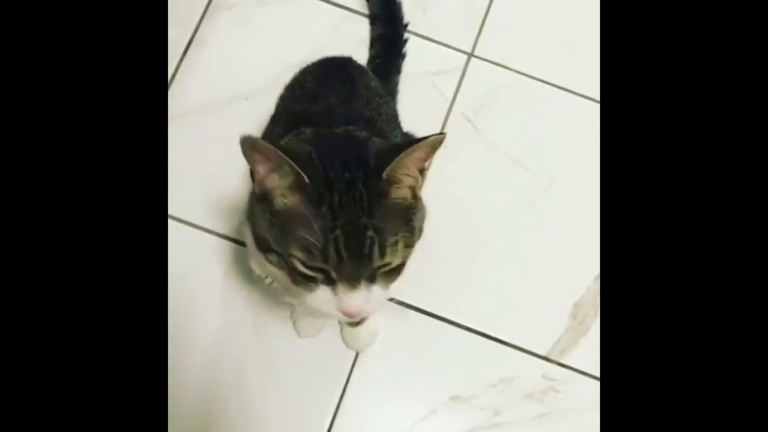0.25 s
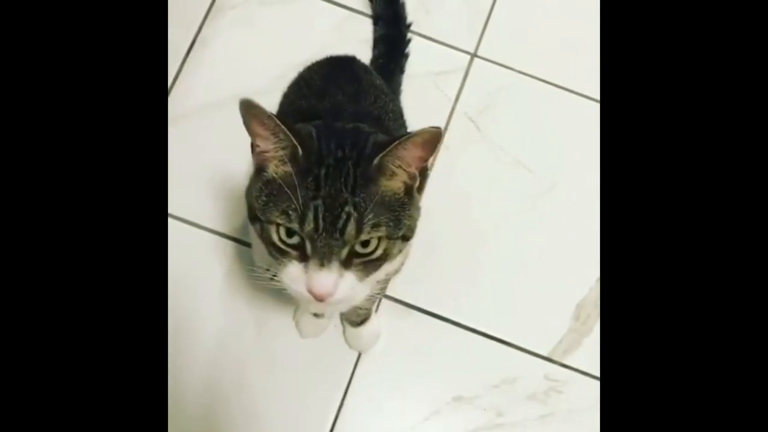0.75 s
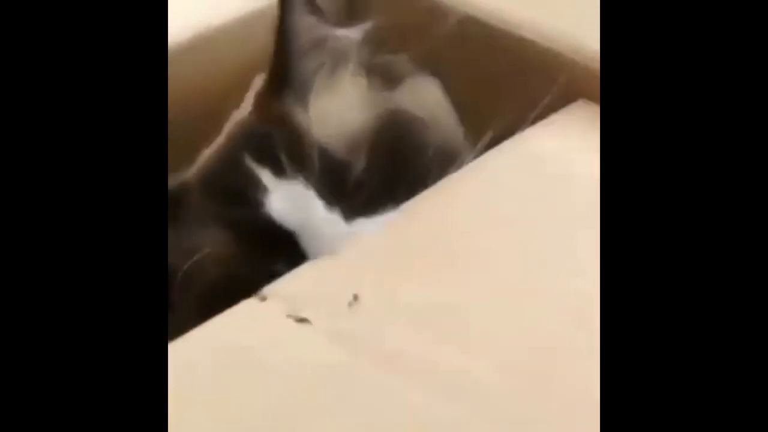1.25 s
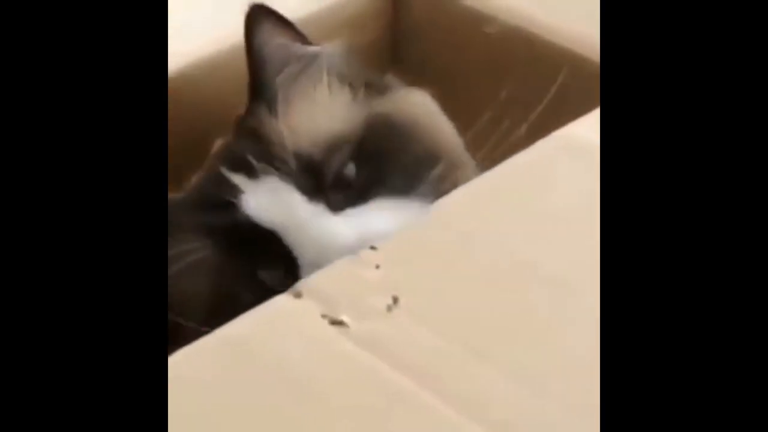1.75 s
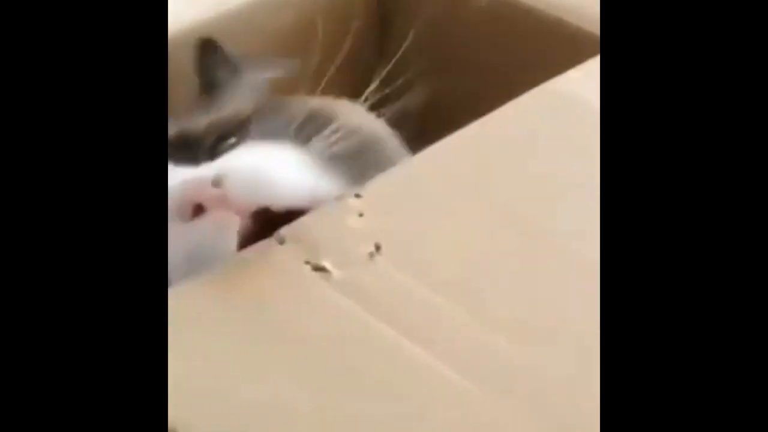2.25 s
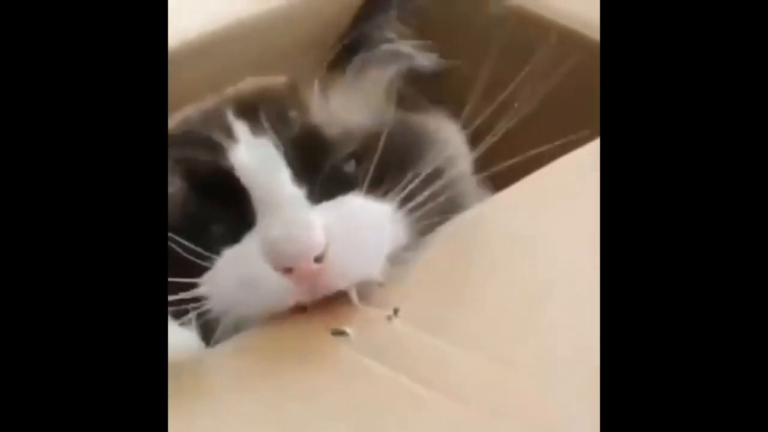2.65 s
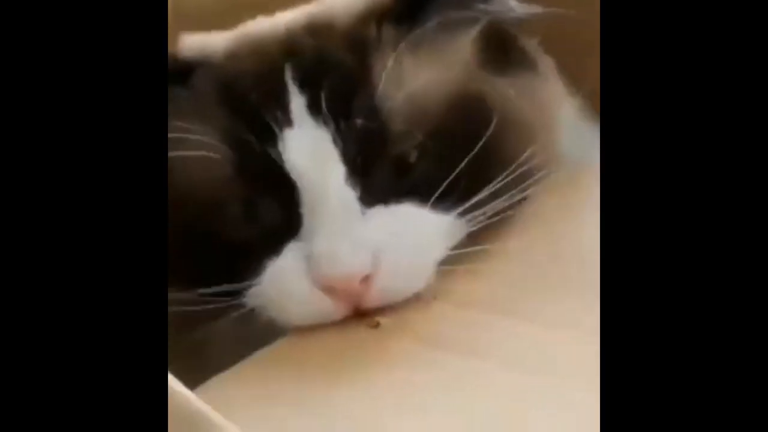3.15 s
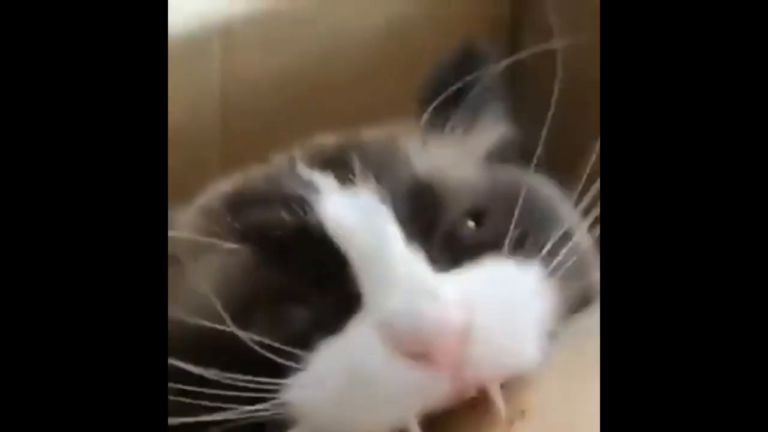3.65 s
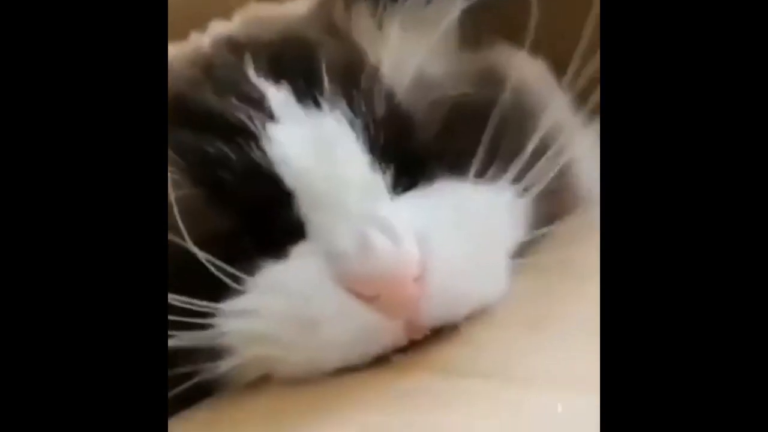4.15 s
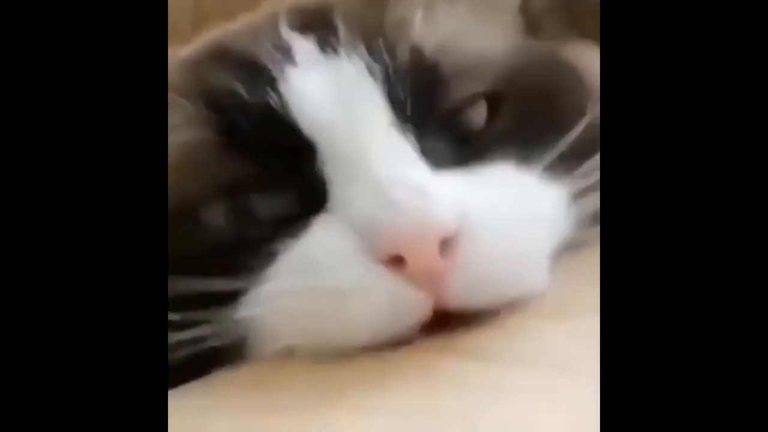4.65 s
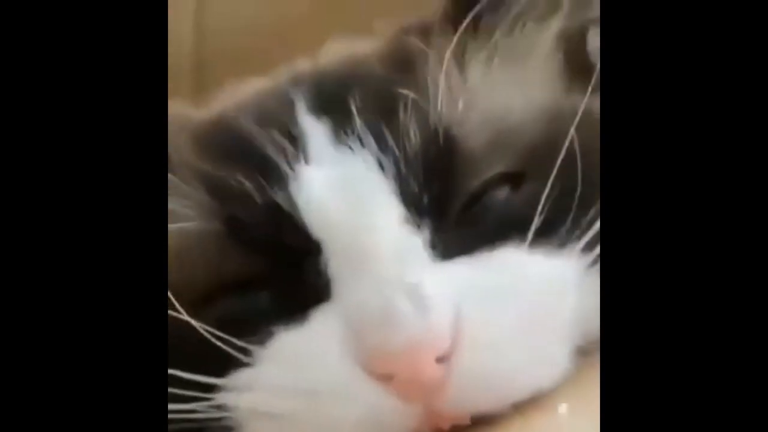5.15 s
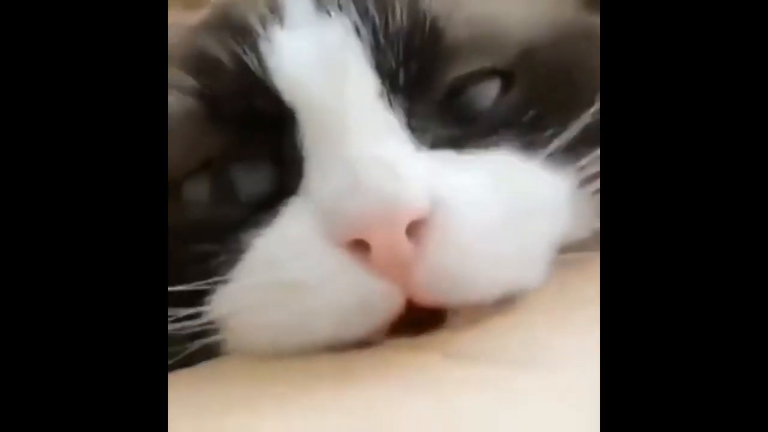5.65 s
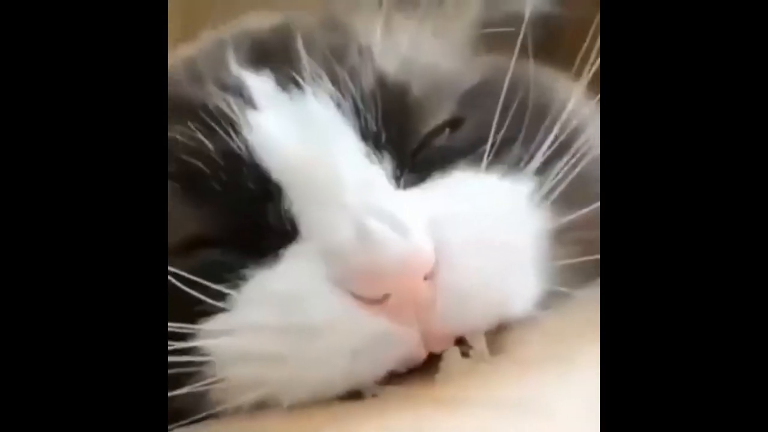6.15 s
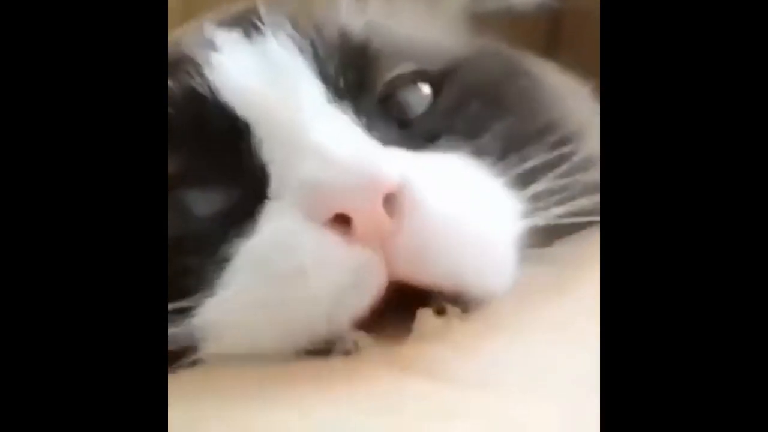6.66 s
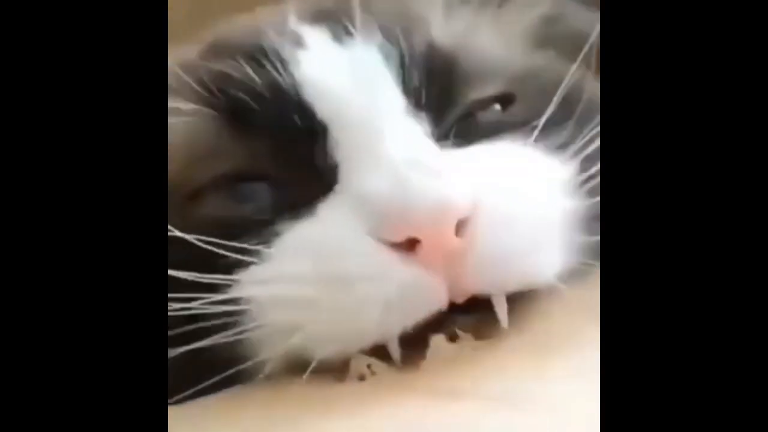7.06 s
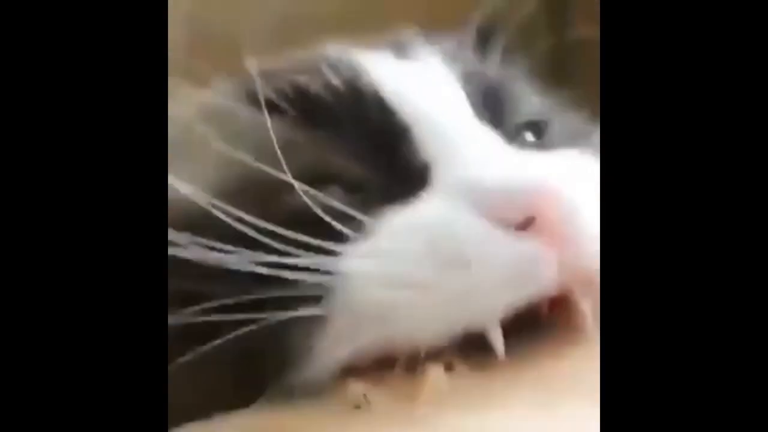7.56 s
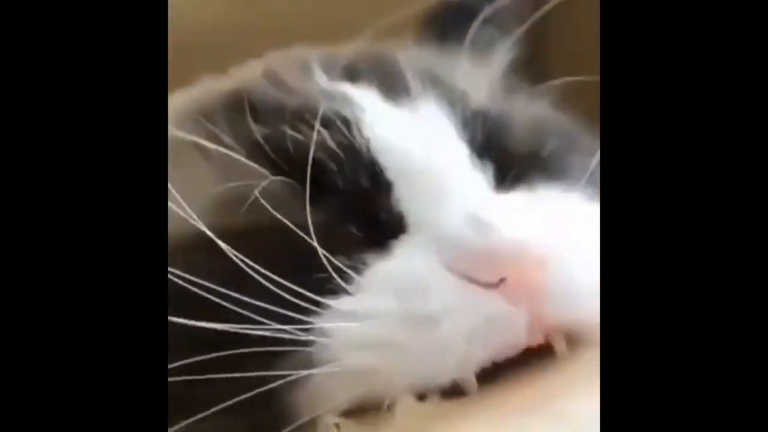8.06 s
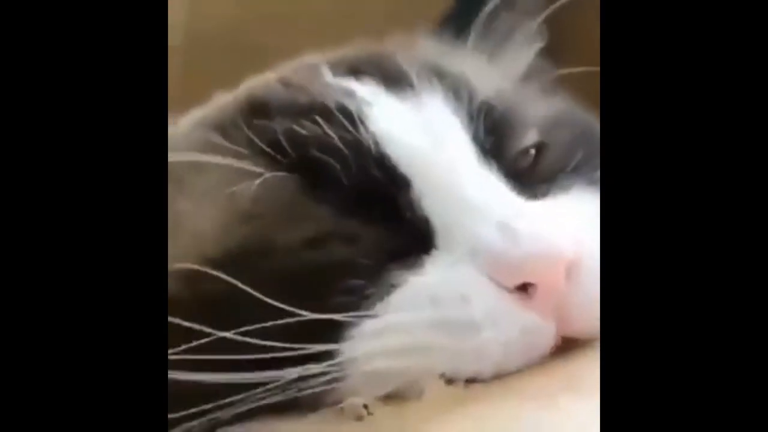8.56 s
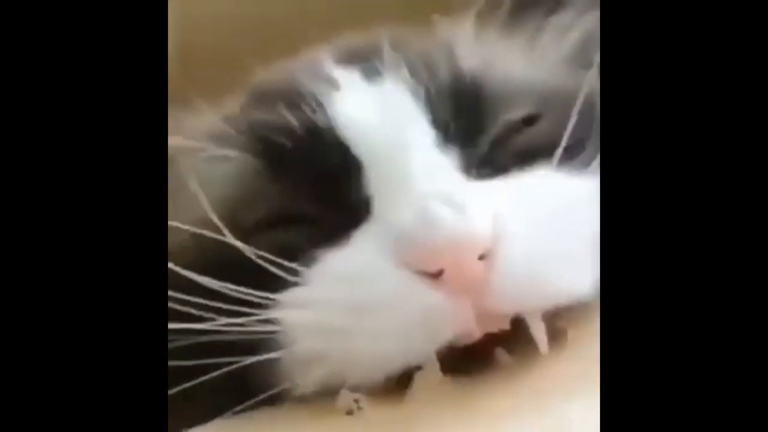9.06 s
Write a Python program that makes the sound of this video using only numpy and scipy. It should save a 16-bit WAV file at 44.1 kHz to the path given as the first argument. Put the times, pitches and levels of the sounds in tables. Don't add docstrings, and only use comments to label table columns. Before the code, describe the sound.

Very close, uneven cardboard chewing: papery rips, sharp fibre snaps, short creaks and boxy tooth knocks, following a near-silent opening and a short gap.

```python
import sys
import numpy as np
from scipy import signal
from scipy.fft import rfft, irfft, next_fast_len
from scipy.io import wavfile
from scipy.ndimage import uniform_filter1d

SR = 44100
rng = np.random.default_rng(int(sys.argv[2]) if len(sys.argv) > 2 else 0)


def gain_from_db(level_db):
    decades = np.asarray(level_db, float) / 20
    return 10 ** decades


def waveform_to_disk(signal):
    frames = np.transpose(np.atleast_2d(signal))
    scaled = np.clip(frames, -1, 1) * 32767
    samples = np.round(scaled).astype(np.int16)
    wavfile.write(sys.argv[1], SR, samples)


N = 411012

SILENCE = 1.009, 1.398
# frequency in Hz, level in dB.
TILED_ROOM = [(15, -56), (25, -19), (103, -5), (145, -15), (247, -14), (506, -24.5), (1320, -29.5),
              (4870, -42), (13400, -44), (14500, -47)]
# frequency in Hz, level in dB.
BOX_ROOM = [(15, -41), (25, -1), (222, -1.5), (275, -2.5), (735, 0.5), (1680, -5.5), (2020, -6),
            (12000, -20), (13400, -29), (14500, -42)]
# frequency in Hz, level in dB.
PAPER_COLOUR = [(1180, -7), (2000, -0.5), (2190, -13), (2810, -2), (6170, -1.5), (7720, -1.5), (9420, -3),
                (12900, -1.5), (14000, -8), (14500, -17)]
# pitch in Hz, width in Hz, level in dB.
BOX_MODES = [(206, 230, -4.5), (348.3, 18.7, 6.5), (436, 64, 2.5), (682, 320, -2.5)]
# pitch in Hz, width in Hz, level in dB.
FLAP_MODES = [(840, 680, -6.5), (1221, 370, 2.5), (1504, 190, -4), (2236, 316, -4.5), (2655, 120, -10)]
# centre in seconds, crackle in dB, spread in ms,
# flap rasp in dB above the crackle.
FLUTE_SNAPS = [(1.4183, -44, .35, -5), (1.7346, -37, 1.1, 3), (2.5374, -42, 0.76, 7),
               (2.879, -23, 1.4, -12), (3.9425, -17, 0.94, -17), (3.9909, -24, 0.76, -13),
               (4.0149, -21, 0.53, -27), (4.2893, -19.5, 1.4, -11), (4.4224, -20.5, 1.1, -29),
               (4.9333, -35, 1.1, -10), (5.5344, -32, 1.1, -10), (5.5574, -23, 0.51, -14),
               (6.3186, -25, 1.6, -0.5), (6.5947, -23, 0.88, -5), (7.7763, -26, 0.25, -12),
               (8.0198, -22.5, 0.43, -10), (8.0258, -26, 0.43, -11), (8.1104, -23.5, 0.84, -22),
               (8.1218, -32, 0.84, -20), (8.1285, -27, .9, -11), (8.1443, -25.5, .7, -10),
               (8.1904, -31, 0.74, -8), (8.2039, -34, .9, -20), (8.2363, -27.5, 1.1, -20),
               (8.2657, -23, .53, -14), (8.2787, -20.5, 1.45, -10.5), (8.35, -24, 2.7, -10),
               (8.7936, -37.5, 0.82, 15.5), (8.8125, -28.5, 2, 5), (8.8279, -28, 0.57, 2.5)]
LINER_SNAPS = [(3.064, -25.5, 0.52, -12), (3.073, -23, 0.45, -13), (3.09, -24, 0.45, -18),
               (3.9686, -37, 0.42, -14), (4.0892, -25.5, 0.98, -10), (4.2179, -17.5, 1.07, -24),
               (4.2648, -26.5, 0.63, -29), (4.3727, -25.5, 0.76, -25), (4.9233, -28, 1.6, -19),
               (5.4351, -34.5, 1.6, -17), (5.5963, -18.5, 0.97, -6), (6.0398, -33, 0.76, -25),
               (6.0627, -36, 1.4, -15), (6.4309, -36, 0.63, -8), (6.4513, -28.5, 1.5, -1),
               (6.5676, -20.5, .78, -9), (6.5802, -27.5, 2.7, -6), (6.8514, -32.5, 1.3, -4),
               (7.3553, -37, 0.71, -20), (8.2617, -22.5, 1, -18), (8.3726, -27, 2, -23),
               (8.4363, -29, 1.1, -25), (8.4418, -26.5, 1.9, -15), (8.572, -34, 0.94, -1),
               (8.579, -30.5, 1.1, -15), (8.7162, -34, 0.63, -6), (9.223, -33.5, 0.47, -5)]
SKIN_SNAPS = [(1.4856, -35.5, .9, 3), (4.1966, -28.5, 1.2, -14), (4.3426, -28, .9, -25),
              (5.2605, -33, 0.8, -16), (5.2675, -28, 1, -9), (5.282, -30, 1.5, -6),
              (5.358, -27.5, 1.4, -15), (5.5828, -18, 1.45, -27), (6.2074, -29.5, 1.1, -7.5),
              (6.3266, -23.5, 0.68, -25), (6.3875, -29, 2, -8), (7.9439, -31.5, 1.8, -17),
              (8.0886, -27, 0.85, -15), (8.3924, -20.5, 0.91, -20), (8.5336, -24.5, 1.7, -27)]
# centre in seconds, rustle in dB, spread in ms,
# board hum in dB above the rustle.
RIPS = [(2.816, -45.5, 10, -28), (2.882, -36, 19, -10.5), (3.075, -35, 21.3, -5), (3.191, -40, 3.9, -19),
        (3.242, -38, 23, -25), (3.935, -37.5, 14, 1.5), (4.022, -34.5, 19, -10), (4.207, -41.5, 9.7, 2),
        (4.292, -31.5, 9.5, -5), (4.381, -34, 18.4, -7.5), (4.457, -36.5, 15.6, -8), (4.532, -40.5, 16, -7),
        (4.64, -41.5, 6.3, -.5), (4.865, -45.5, 10, -25), (5.277, -33, 14.7, -3), (5.516, -38, 7.1, -17),
        (5.796, -35.5, 6.1, -6.5), (6.321, -32.5, 14, -6), (6.395, -43.5, 24, 2), (6.638, -33.5, 4.1, -27),
        (6.71, -45, 7.8, -3), (8.167, -32.5, 12, -9), (8.271, -39, 14, 3), (8.328, -28, 2.8, -15),
        (8.386, -26, 8.2, -13), (8.449, -37, 4.3, 5), (8.487, -40, 4.1, -1), (8.539, -36.5, 23, -8.5),
        (8.607, -42.5, 21, -9), (8.728, -41.5, 4.6, -30)]
# centre in seconds, rustle in dB, spread in ms,
# flap rasp in dB above the rustle.
RUBS = [(1.765, -55.5, 8.3, 1), (3.318, -31, 29.3, -2), (3.833, -37, 4.8, 0), (4.085, -38.5, 12.5, -0.5),
        (4.797, -45, 19, -4), (5.36, -30.5, 5.9, -6.5), (5.438, -42.5, 8.5, 2.5), (5.584, -40, 25.4, 2.5),
        (5.674, -45, 11, -8), (5.896, -45.5, 4.2, -1), (5.951, -44, 29, 0.5), (6.482, -37.5, 17.5, -4),
        (6.553, -37.5, 29, -8), (6.627, -29.5, 9.9, -3), (6.854, -51, 18, 1.5), (6.925, -46, 21, 3),
        (7.043, -47, 23, 1), (7.128, -47.5, 25, -5), (7.208, -45, 14, -9), (7.541, -47.5, 6.7, 7),
        (7.595, -36, 21, 0.5), (7.659, -45, 8.9, -1), (7.766, -47.5, 26, -5), (7.844, -35, 15.4, -4),
        (7.958, -47, 16, 0.5), (8.818, -39, 19.5, 7), (9.004, -49, 24, 6), (9.241, -41, 14.5, -5),
        (9.32, -21.5, 2.6, -10)]
# centre in seconds, rustle in dB, spread in ms, creak in Hz,
# flap rasp in dB above the rustle.
CREAKS = [(1.515, -38, 20.7, 1900, -4), (2.385, -55.5, 25, 760, 11), (3.003, -38.5, 16, 745, -4.5),
          (3.519, -33, 10.4, 2190, 4.5), (3.561, -28.5, 19, 2190, 2.5), (3.627, -28.5, 19.3, 2150, -1.5),
          (3.697, -22, 16, 1430, -8.5), (3.565, -43.5, 16, 800, 12), (4.938, -48, 9.8, 980, 14),
          (5.014, -53, 11.7, 950, 15), (6.041, -45, 13, 1850, -2), (9.009, -34.5, 1.8, 990, 7.5)]
# start in seconds, peak in dB, panel pitch in Hz, flap ring in dB.
SLACK_KNOCKS = [(1.488, -33.5, 352, -29), (2.534, -27, 234, -6), (2.602, -33.5, 235, -17),
                (2.646, -34, 235, -8), (2.885, -30.5, 235, -15), (3.063, -25.5, 230, -9),
                (3.095, -30, 248, -10), (3.313, -30, 320, -3), (3.348, -33, 342, -16), (3.574, -27, 350, 3),
                (3.835, -25.5, 263, 1.5), (5.136, -30, 350, -4), (6.313, -25.5, 280, -7),
                (7.134, -20, 295, -3.5), (7.753, -25, 288, -21), (7.859, -21, 317, -11),
                (7.941, -43.5, 344, 16.5), (8.179, -25.5, 350, -13), (8.233, -31, 340, -16),
                (8.395, -22.5, 361, -22), (8.437, -26.5, 332, -18), (9.221, -16, 346, -6)]
TAUT_KNOCKS = [(1.734, -24, 473, -30), (3.942, -36, 410, -2), (4.008, -34, 404, -11),
               (4.285, -22.5, 417, 2.5), (4.419, -21, 450, -20), (4.918, -25, 382, -1.5),
               (5.273, -27.5, 384, -15), (5.357, -26.5, 430, -20), (5.594, -11.5, 435, -15),
               (5.635, -25, 447, -12), (5.89, -24.5, 397, -8), (6.631, -26, 480, -8), (6.849, -11, 397, -2),
               (7.033, -28, 444, -9), (7.12, -24, 436, -12), (7.296, -36, 453, .5),
               (7.532, -27.5, 457, -12), (7.774, -13.5, 386, -8.5), (7.831, -25.5, 393, -1),
               (8.274, -23, 430, -21), (8.528, -26, 466, -7), (8.792, -21.5, 500, -4),
               (8.813, -16, 420, -18), (9.007, -23.5, 470, 7), (9.314, -23, 486, -1.5)]
# time in seconds, paper rustle in dB, share carried by the board in dB.
JAW_PRESSURE = [(1.6, -56, -10), (2.89, -50.5, -4.5), (3.04, -47, -4), (4.44, -42.5, -2.5), (4.52, -48, -9),
                (5.25, -52, 3), (5.45, -44.5, -3.5), (5.92, -53, 4.5), (6.31, -46, -5), (6.48, -37.5, -5.5),
                (6.67, -51, -3), (7.47, -59, 3), (8.07, -48, 4), (8.31, -43, -8.5), (8.82, -54, 3.5),
                (9.32, -52, 5)]
# start in seconds, peak in dB.
THUMPS = [
    (3.832, -33.5),
    (1.6, -49),
    (5.599, -61),
    (5.888, -34),
    (7.558, -43),
]
LONG_TEAR = (3.578, 3.785)


def curve(s, v):
    return np.interp(np.arange(N) / SR, s, v)


def unit(x):
    return x / np.sqrt(np.mean(x ** 2))


def ring(x, hz, width):
    return signal.lfilter(*signal.iirpeak(hz, hz / width, fs=SR), x)


def body(x, modes):
    out = 0
    for k, (hz, width, db) in enumerate(modes):
        out = out + (-1) ** k * gain_from_db(db) * ring(x, hz, width)
    return out


def colour(x, spectrum):
    hz, db = np.transpose(spectrum)
    size = next_fast_len(N)
    log_hz = np.log(np.maximum(np.arange(size // 2 + 1) * SR / size, 1))
    gain = gain_from_db(np.interp(log_hz, np.log(hz), db))
    return unit(irfft(rfft(x, size) * gain, size)[:N])


def walk(rate):
    hold = int(SR / rate)
    levels = np.repeat(rng.standard_normal(N // hold + 1), hold)
    return unit(uniform_filter1d(levels, hold)[:N])


def slips(size, per_s, spread_db):
    when, big, sign = rng.random((3, size))
    strength = gain_from_db(spread_db * np.minimum(-np.log(1 - big), 4))
    return (when < per_s / SR) * strength * np.sign(sign - 0.5)


def add(out, s, x):
    i = int(s * SR)
    out[i:i + len(x)] += x[:N - i]


def air(spectrum, db):
    return gain_from_db(db + 0.18 * walk(18)) * colour(rng.standard_normal(N), spectrum)


def swarms(rows, per_s, spread_db, focus_db, stutter_db):
    out = np.zeros(N)
    grip = gain_from_db(stutter_db * walk(130))
    broad = colour(slips(N, per_s, spread_db) * grip, PAPER_COLOUR)
    hum_drive = slips(N, per_s / 4, spread_db) * grip
    for s, db, ms, hz, rasp_db, *hum_db in rows:
        half = int(3 * ms * SR / 1000)
        start = int(s * SR) - half
        u = np.arange(-half, half) * 1000 / (ms * SR)
        shape = np.exp(-np.abs(np.where(u < 0, 1.3, 0.9) * u) ** 2.09 / 4)
        energy = np.sum(shape ** 2)

        def swell(x):
            return np.pad(x * shape, (0, 3000))

        def even(x):
            return x * np.sqrt(energy / np.sum(x ** 2))

        fibres = np.resize(broad[start:start + 2 * half], 2 * half)
        direct = swell(fibres)
        bright_hz = max(hz, 3000)
        sound = even(direct + gain_from_db(focus_db) * ring(direct, bright_hz, 0.36 * bright_hz))

        push = swell(np.resize(hum_drive[start:start + 2 * half], 2 * half) + 0.11 * fibres)
        rasp = ring(body(push, FLAP_MODES), 1500, 2500)
        if hz < 3000:
            rasp = rasp + gain_from_db(6) * ring(push, hz, 0.11 * hz)
        sound += gain_from_db(rasp_db) * even(rasp)
        for level_db in hum_db:
            sound += gain_from_db(level_db) * even(ring(body(push, BOX_MODES), 253, 420))
        add(out, start / SR, gain_from_db(db) * sound)
    return out


def snaps():
    rows = []
    for ply, hz in ((FLUTE_SNAPS, 4930), (LINER_SNAPS, 8100), (SKIN_SNAPS, 12600)):
        for s, db, ms, rasp_db in ply:
            rows.append((s, db, ms, hz * (0.96 + 0.089 * rng.random()), rasp_db))
    return swarms(rows, per_s=18000, spread_db=4.5, focus_db=5, stutter_db=1.5)


def tears():
    rip_hz, rub_hz = 6500, 1163
    rip_rasp_db = -10.5
    rub_hum_db, creak_hum_db = 0, -4.5
    rows = [(s, db, ms, rip_hz, rip_rasp_db, hum_db) for s, db, ms, hum_db in RIPS]
    rows += [(s, db, ms, rub_hz, rasp_db, rasp_db + rub_hum_db) for s, db, ms, rasp_db in RUBS]
    rows += [(*row, row[-1] + creak_hum_db) for row in CREAKS]
    return swarms(rows, per_s=15000, spread_db=1.5, focus_db=-13, stutter_db=1.5)


def knocks(rows, push_ms=0.19, late_ms=1.854):
    out, t = np.zeros(N), np.arange(5000) / SR
    push = t * np.exp(-t * 1000 / push_ms)
    box = gain_from_db(-11.5) * body(push, BOX_MODES)
    flap = ring(push, 1026, 240) + gain_from_db(-4) * body(push, FLAP_MODES)
    flap = flap / np.abs(flap).max()
    signs = np.sign(rng.random(len(rows)) - 0.5)
    for (s, db, hz, flap_db), sign in zip(rows, signs):
        panel = ring(push, hz, 0.35 * hz) + gain_from_db(2) * ring(push, hz, 0.075 * hz) + box
        knock = panel / np.abs(panel).max() + gain_from_db(flap_db) * flap
        add(out, s + late_ms / 1000, sign * gain_from_db(db) * knock)
    return out


def scrape():
    s, rustle_db, board_db = np.transpose(JAW_PRESSURE)
    grip = walk(45)
    rustle = colour(slips(N, per_s=16000, spread_db=6.0) * gain_from_db(1.75 * grip), PAPER_COLOUR)
    drive = slips(N, per_s=4000, spread_db=2.6) * gain_from_db(3.2 * grip)
    hum = unit(ring(body(drive, BOX_MODES), 316, 410))
    rasp = unit(ring(body(drive, FLAP_MODES), 1700, 3500))
    board = hum + gain_from_db(-4) * rasp
    return gain_from_db(curve(s, rustle_db)) * (rustle + gain_from_db(curve(s, board_db)) * board)


def thumps():
    out, t = np.zeros(N), np.arange(8000) / SR
    thud = ring(t * np.exp(-t / 0.0011), 138, 37)
    for s, db in THUMPS:
        add(out, s, gain_from_db(db + 2.0) * thud / np.abs(thud).max())
    return out


def groan():
    hz, width_hz, level_db = 350, 12.4, -36
    start, end = (int(s * SR) for s in LONG_TEAR)
    drive = slips(end - start, per_s=1930, spread_db=7)
    tone = unit(ring(ring(drive, hz, width_hz), hz, 2 * width_hz))
    fade = signal.windows.tukey(end - start, 0.2)
    return np.pad(gain_from_db(level_db) * tone * fade, (start, N - end))


def patchy(x, low_hz, depth, rate):
    patches = sum(walk(rate) * ring(x, hz, hz / 3) for hz in low_hz * 2 ** (np.arange(5) / 2))
    return x + depth * patches


def echo(x):
    t = np.arange(int(0.2 * SR)) / SR
    tail = rng.standard_normal(len(t)) * gain_from_db(-60 * t / 0.058) * (t > 0.004)
    return signal.fftconvolve(x, tail)[:N]


def scene():
    t = np.arange(N) / SR
    crackle = snaps()
    rubbing = signal.lfilter(*signal.butter(1, 130, "high", fs=SR), scrape() + tears())
    rubbing = patchy(rubbing, low_hz=3070, depth=0.27, rate=14)
    rubbing = patchy(rubbing, low_hz=230, depth=0.32, rate=18)
    lull = np.roll(uniform_filter1d(np.abs(crackle), 500), 600)
    near = rubbing / (1 + 110 * lull) + crackle
    near = near + knocks(SLACK_KNOCKS) + knocks(TAUT_KNOCKS) + thumps() + groan()
    first = air(TILED_ROOM, -65.5)
    second = near + gain_from_db(-29.5) * echo(near) + air(BOX_ROOM, -52.5)
    silence_start, silence_end = SILENCE
    return (first * (t < silence_start) + second * (t > silence_end))[None]


def roll_off(x):
    return signal.sosfilt(signal.butter(12, 15110, fs=SR, output="sos"), x)


def record(dry):
    thin = signal.lfilter(*signal.butter(1, 45, "high", fs=SR), dry)
    top_cut = signal.ellip(8, 0.2, 60, 13960, fs=SR, output="sos")
    return roll_off(signal.sosfilt(top_cut, thin))


dry = scene()
out = record(dry)
waveform_to_disk(out)
```